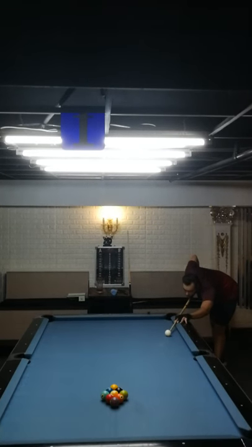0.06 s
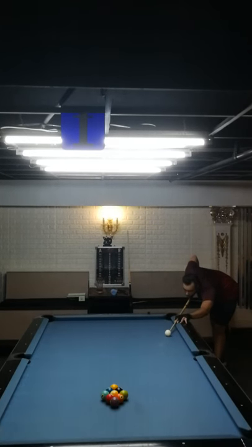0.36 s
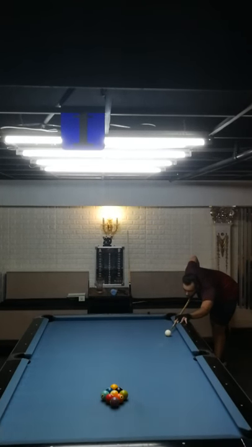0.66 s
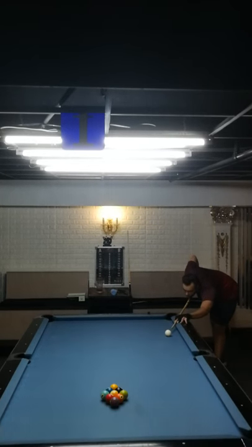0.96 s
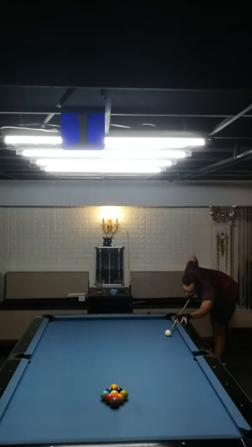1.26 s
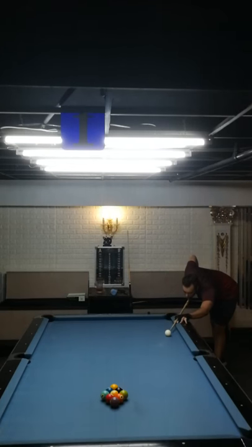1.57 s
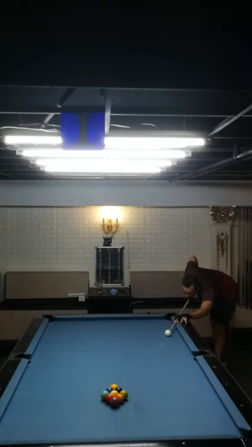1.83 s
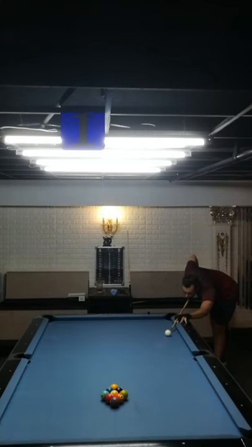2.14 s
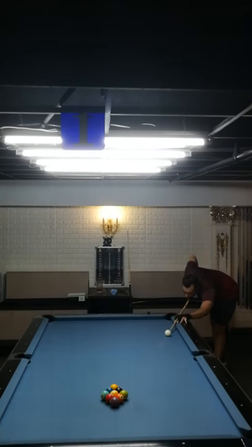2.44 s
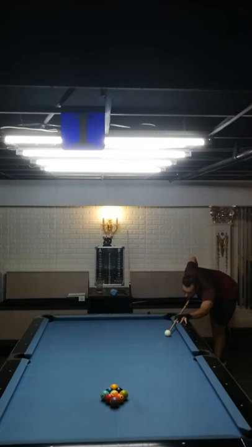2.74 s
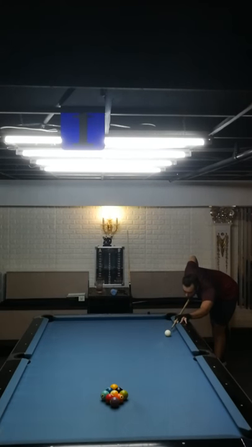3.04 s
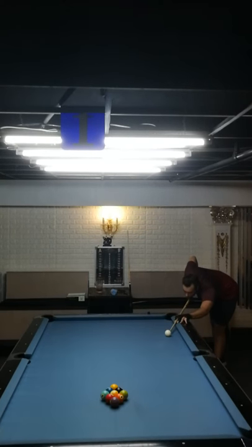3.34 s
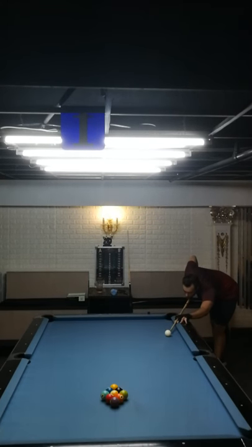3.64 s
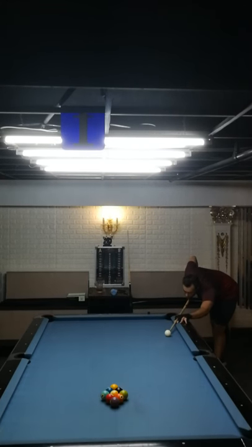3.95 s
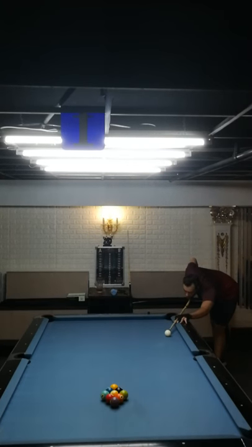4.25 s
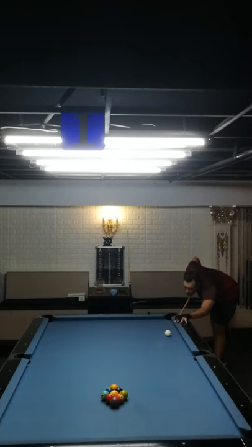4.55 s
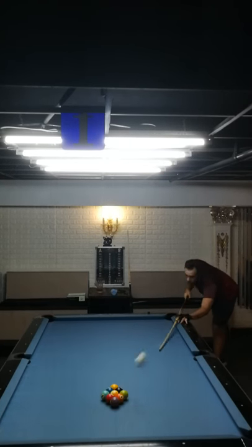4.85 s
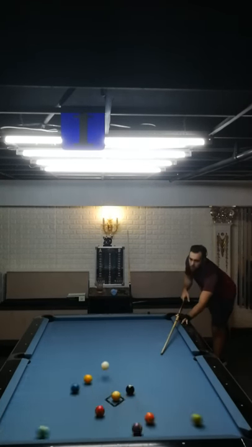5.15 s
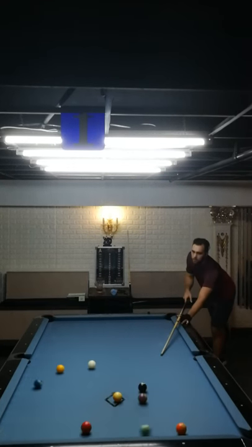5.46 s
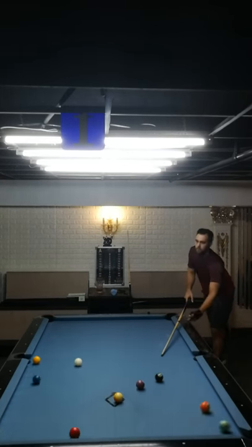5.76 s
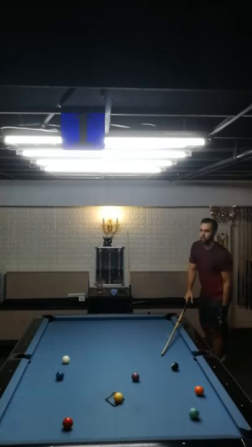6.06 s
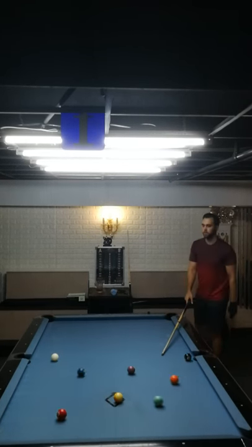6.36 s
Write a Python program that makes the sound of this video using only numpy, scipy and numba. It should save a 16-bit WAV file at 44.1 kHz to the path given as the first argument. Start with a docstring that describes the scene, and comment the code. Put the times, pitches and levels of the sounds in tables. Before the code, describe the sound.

Ventilation fans hum and slowly throb in a bare room for almost five seconds. Then a cue cracks against the cue ball, which knocks on the table and smashes loudly into the racked pool balls. They scatter, rumbling over the cloth, thudding against the cushions and clicking faintly as they slow. Each hit has a short echo, and the sound is brighter in the left microphone.

```python
"""A sharp crack and a loud smash, then rolling, thuds and clicks: a break shot on a pool table.
The cue strikes the cue ball, which scatters the racked balls; they rumble over the cloth and bump
the cushions. Each hit is a short pulse that echoes round a bare room, where two fans hum and throb.
A limiter turns the smash down and lets the sound swell back; the right microphone is shaded and dull."""
import sys
import numpy as np
from scipy import signal
from scipy.fft import rfft, irfft
from scipy.io import wavfile
from numba import njit

SR = 44100
rng = np.random.default_rng(int(sys.argv[2]) if len(sys.argv) > 2 else 0)


def waveform_to_disk(signal):
    """Save audio, clipped to [-1, 1], as 16-bit WAV at the path in sys.argv[1]."""
    frames = np.transpose(np.atleast_2d(signal))
    scaled = np.clip(frames, -1, 1) * 32767
    samples = np.round(scaled).astype(np.int16)
    wavfile.write(sys.argv[1], SR, samples)


N = 282240
BLOW = 2 ** 15   # samples in which a hit dies away
BREAK_S = 4.9449   # the cue ball reaches the rack
RIGHT_LAG_S = 26 / SR
FAN_A_HZ, FAN_B_HZ, MAINS_HZ = 73.81, 69.44, 120


def from_db(db):
    """Turn decibels into a number to multiply a sound by."""
    return 10 ** (np.asarray(db) / 20)


def at_hz(points, hz):
    """Read between the rows of a table, with all octaves equally wide."""
    known, values = np.transpose(points)
    return np.interp(np.log(np.maximum(hz, 1)), np.log(known), values)


def bins(size):
    """List the frequencies in a spectrum of this many samples."""
    return np.arange(size // 2 + 1) * SR / size


def coloured(x, colour):
    """Make each frequency louder or softer, as a table says."""
    size = x.shape[-1]
    return irfft(rfft(x) * from_db(at_hz(colour, bins(size))), size)


def diffuse(size):
    """White room noise at two microphones: the right hears it later, and less alike in the treble."""
    # how alike the two sides are: (frequency [Hz], likeness [0-1])
    likeness = [(80, .998), (200, 0.84), (400, 0.81), (800, 0.68), (3000, 0.28), (8000, 0.28), (15000, .6)]
    hz = bins(size)
    left, other = rfft(rng.standard_normal((2, size)))
    alike = np.clip(at_hz(likeness, hz), 0, 1)
    right = alike * left + np.sqrt(1 - alike ** 2) * other
    lag = np.exp(-2j * np.pi * hz * RIGHT_LAG_S)
    return irfft(np.array([left, right * lag]), size)


def steady(spectrum):
    """Even room noise with the given level per Hz."""
    return coloured(diffuse(N), spectrum) * np.sqrt(SR / 2)


def body(colour, modes=()):
    """A struck thing gives a short crack and rings on at its own notes (modes), if it has any."""
    t = np.arange(BLOW) / SR
    # minimum phase: keep the colour, but pack the sound at the very start
    cepstrum = irfft(np.log(from_db(at_hz(colour, bins(BLOW)))))
    cepstrum[1:BLOW // 2] *= 2
    cepstrum[BLOW // 2 + 1:] = 0
    crack = irfft(np.exp(rfft(cepstrum)))
    return crack + sum(from_db(db) * np.exp(-np.log(1000) * t / fade_s) * np.cos(2 * np.pi * hz * t)
                       for hz, db, fade_s in modes)


def room(direct_db, build_s, direct_s=0.00048, band_count=9):
    """Sound arrives directly (direct_db against the tail), then as two echoes and a fading tail."""
    # echoes off the lamp and ceiling: (delay [s], level against the direct sound [dB])
    echoes = [(.0077, -21), (.0136, -10)]
    # how long the room rings: (frequency [Hz], time to fade 60 dB [s])
    fade_times = [(100, 0.18), (350, .6), (1000, 0.55), (2500, 0.49), (5000, 0.28), (12000, 0.32)]
    t = np.arange(BLOW) / SR
    centres = np.geomspace(60, 15000, band_count)
    noise, tail = rfft(diffuse(BLOW)), 0
    for hz, share in zip(centres, np.eye(band_count)):
        band = irfft(noise * at_hz(np.c_[centres, share], bins(BLOW)))
        tail = tail + band * np.exp(-np.log(1000) * t / at_hz(fade_times, hz))
    path = tail * (1 - np.exp(-t / build_s))
    path /= np.sqrt(SR * fade_times[2][1] / np.log(1e6))   # divide out a mid-range tail's strength
    for delay, db in [(direct_s, 0)] + echoes:
        path[:, round(delay * SR)] += from_db(direct_db + db)
    return path


def add(out, s, sound):
    """Mix a sound in, starting at s seconds."""
    start = round(s * SR)
    out[:, start:start + sound.shape[-1]] += sound[..., :N - start]


def blows(hits, struck, direct_db, steepness, build_s=0.0014):
    """Each hit takes its own path through the room; a longer contact cuts off more treble."""
    out = np.zeros((2, N))
    for s, db, cutoff_hz in hits:
        contact = signal.butter(steepness, min(cutoff_hz, SR / 2 - 1000), fs=SR, output="sos")
        pulse = signal.sosfilt(contact, struck + 1e-18)
        pulse = from_db(db) * pulse / np.sqrt(np.sum(pulse ** 2))
        add(out, s, signal.fftconvolve(room(direct_db, build_s), pulse[None], axes=1))
    return out


def fans(waver=0.23, waver_hz=3, in_step_s=1.965):
    """Two motors at nearly the same speed drift in and out of step, throbbing over rushing air."""
    # hum of each fan and the mains: (pitch [Hz], list of (multiple of the pitch, level [dB]))
    hums = [(FAN_A_HZ, [(1, -43.8), (2, -53), (3, -56), (4, -57), (5, -68)]), (FAN_B_HZ, [(1, -48.3),
            (3, -58), (4, -66)]), (MAINS_HZ, [(1, -58.5), (2, -64)])]
    # rush of the ventilation: (frequency [Hz], level [dB per Hz])
    air = [(20, -80.5), (45, -81), (75, -66), (110, -70.5), (230, -71.5), (310, -72), (480, -81.5),
           (900, -77), (1500, -82.5), (2200, -87), (3300, -91.5), (5000, -105), (7500, -116), (15000, -128)]
    t = np.arange(N) / SR - in_step_s - np.array([[0], [RIGHT_LAG_S]])
    hum = 0
    for hz, tones in hums:
        for multiple, db in tones:
            slow = irfft(rfft(rng.standard_normal(N)) * np.exp(-(bins(N) / waver_hz) ** 2), N)
            swell = 1 + waver * (multiple - 1) * slow / slow.std()   # only the overtones waver
            hum = hum + np.sqrt(2) * from_db(db) * swell * np.cos(2 * np.pi * hz * round(multiple) * t)
    return hum + steady(air)


def whistles(width_hz=9):
    """Faint tones, each a narrow band of noise, come and go in the rush of air."""
    # the tones: (time of the top [s], pitch [Hz], level [dB], half length [s])
    tones = [(.55, 1045, -59.5, .22), (1.21, 835, -55, .11), (1.68, 838, -56.5, .13), (3.53, 664, -60, .08)]
    t, noise, out = np.arange(N) / SR, rfft(diffuse(N)), 0
    for s, hz, db, half_s in tones:
        narrow = irfft(noise / (1 + ((bins(N) - hz) / width_hz) ** 2), N)
        out = out + from_db(db) * np.exp(-.5 * ((t - s) / half_s) ** 2) * narrow / narrow.std()
    return out


def rolling(roll_db=-3.5, rise_s=.15, fade_db_per_s=2.5, swell_s=5.85, swell_db=2.5, swell_half_s=.075):
    """The scattered balls rumble, swell once and fade as the cloth slows them."""
    # balls rolling on the slate under the cloth: (frequency [Hz], level before shaping [dB per Hz])
    rumble = [(40, -73), (110, -69), (200, -59.5), (320, -65.5), (500, -76), (900, -72.5), (1600, -86),
              (4000, -111), (12000, -150)]
    t = np.arange(N) / SR
    age = np.maximum(t - BREAK_S, 0)
    roll = from_db(roll_db - fade_db_per_s * age) * (1 - np.exp(-age / rise_s))
    swell = from_db(swell_db) * np.exp(-.5 * ((t - swell_s) / swell_half_s) ** 2)
    return np.hypot(roll, swell) * steady(rumble)


def ball_ticks(cutoff_hz=6700):
    """Faint, sharp ticks sound among the balls."""
    # the ticks: (time [s], level [dB])
    ticks = [(5.362, -17), (5.507, -15.5), (6.048, -20)]
    # tone of a tick: (frequency [Hz], relative level [dB])
    colour = [(300, -14), (2000, 5), (5000, -6), (14000, -37)]
    hits = [(s, db, cutoff_hz) for s, db in ticks]
    return blows(hits, body(colour), direct_db=-13, steepness=1, build_s=0.0018)


def cushion_thuds(nudge_count=3, from_s=5.62, to_s=5.92, nudge_db=-8, spread_db=2):
    """Balls bump the table's rails; a faster ball leaves the rubber sooner and sounds brighter."""
    # ball on cushion: (time [s], level [dB])
    bumps = [(5.03, 5), (5.097, 6), (5.147, 6.5), (5.2312, 19), (5.244, 15), (5.4045, 10), (5.437, 7),
             (5.495, 4.5), (5.785, -2), (5.941, -6), (6.274, -2), (6.318, -3.5), (6.368, -1)]
    # tone of a rail: (frequency [Hz], relative level [dB])
    colour = [(50, -26), (120, 0), (230, 5), (340, 0), (480, 5.5), (750, 10), (1100, 10.5), (1800, 6.5),
              (2700, 9), (4000, 4.5), (6000, -24), (12000, -34)]
    # ringing of the rails: (pitch [Hz], relative level [dB], time to fade 60 dB [s])
    modes = [(335, -44, .25), (378, -47, .15), (667, -50, .25), (746, -50, .25), (1102, -48, .2),
             (1220, -49, .25), (1384, -50, .2), (1506, -49, .2)]
    # slow balls add a few soft nudges at random
    slots = (np.arange(nudge_count) + rng.random(nudge_count)) / nudge_count
    nudges = zip(from_s + (to_s - from_s) * slots, nudge_db + spread_db * rng.standard_normal(nudge_count))
    cutoff_hz, db_per_octave = 750, 16.5   # treble cut-off at 0 dB, and the extra level that doubles it
    hits = [(s, db, cutoff_hz * 2 ** (db / db_per_octave)) for s, db in [*bumps, *nudges]]
    return blows(hits, body(colour, modes), direct_db=-14.5, steepness=3)


def slate_knocks():
    """The hopping cue ball lands on the slate; then the break jolts the slate with a dull thud."""
    # knocks on the slate: (time [s], level [dB], treble cut-off [Hz])
    hits = [(4.862, 3, 9000), (4.876, 11, 7000), (4.949, 14, 900)]
    # tone of a knock: (frequency [Hz], relative level [dB])
    colour = [(100, -17), (350, -7), (700, -4.5), (1300, -1), (2200, -1.5), (3300, -5.5), (4500, -7),
              (7000, -19), (10000, -27), (14000, -55)]
    return blows(hits, body(colour), direct_db=-24, steepness=2)


def cue_strike():
    """The cue cracks against the ball, knocks the table with its shaft and rings briefly."""
    # cue on ball and table: (time [s], level [dB], treble cut-off [Hz])
    hits = [(4.7862, 16.5, 1210), (4.7884, 8.5, 14000), (4.801, 14, 8000)]
    # tone of the cue: (frequency [Hz], relative level [dB])
    colour = [(60, -33), (180, -7), (340, -1.5), (500, -7.5), (750, 1.5), (1200, 0.5), (1800, -4),
              (2700, 2), (3600, -2.5), (5500, -13), (8000, -18.5), (14000, -37)]
    # ringing of the cue: (pitch [Hz], relative level [dB], time to fade 60 dB [s])
    modes = [(895, -50, .2), (982, -52, .2), (1400, -45, .1), (1506, -41, .22), (2189, -46, .3),
             (2420, -51, .25), (2560, -48, .15), (2805, -47, .25), (4385, -34, .085), (4470, -40, .06),
             (5930, -44, .045)]
    return blows(hits, body(colour, modes), direct_db=-17, steepness=2)


def overload_thump(db=2, length_s=0.00096, after_s=0.0012):
    """A brief low thump as the loud crack overloads the microphones."""
    out = np.zeros((2, N))
    age = np.arange(BLOW) / SR / length_s
    add(out, BREAK_S + after_s, -from_db(db) * age * np.exp(1 - age))
    return out


def ball_smash():
    """The blow runs from ball to ball through the rack; one more clack comes later."""
    # ball on ball: (time [s], level [dB], treble cut-off [Hz])
    hits = [(4.9449, 26, 2950), (4.9452, 8, 4900), (4.9453, 23, 3150), (5.5875, 3, 2850)]
    # tone of a clack: (frequency [Hz], relative level [dB])
    colour = [(60, -58), (300, -25), (600, -13.5), (1100, -1), (1800, 2.5), (2700, 4.5), (4000, 11),
              (12000, -1)]
    return blows(hits, body(colour), direct_db=-6.5, steepness=12, build_s=0.0033)


def scene():
    """Mix the shot, the scattering balls and the room's hum."""
    shot = cue_strike() + slate_knocks() + ball_smash() + overload_thump()
    return shot + cushion_thuds() + ball_ticks() + rolling() + fans() + whistles()


@njit
def follow(over, attack, release):
    """Follow a level up quickly and let go slowly (times in samples)."""
    out, held = np.zeros(len(over)), 0.
    for i in range(len(over)):
        held += (over[i] - held) / (attack if over[i] > held else release)
        out[i] = held
    return out


def record(dry, limit_db=-9.7, attack_s=0.00032, release_s=.14, cutoff_hz=15800):
    """Two hissing microphones feed a limiter too slow for the first peak, which gets squashed."""
    # microphone hiss: (frequency [Hz], level [dB per Hz])
    hiss_colour = [(100, -112), (3000, -113), (7000, -116), (11000, -118), (15000, -120)]
    # dullness of the shaded right microphone: (frequency [Hz], level against the left [dB])
    right_shade = [(60, 0), (220, 0), (380, -1), (700, -7), (1300, -10), (2400, -14), (4400, -18),
                   (8000, -14), (15000, -11)]
    hiss = coloured(rng.standard_normal((2, N)), hiss_colour) * np.sqrt(SR / 2)
    heard = np.array([dry[0], coloured(dry[1], right_shade)]) + hiss
    level_db = 20 * np.log10(np.abs(heard).max(axis=0) + 1e-9)
    over_db = np.maximum(level_db - limit_db, 0)
    limited = heard * from_db(-follow(over_db, attack_s * SR, release_s * SR))
    clipped = limited / (1 + limited ** 4) ** .25
    treble_cut = signal.ellip(10, .1, 80, cutoff_hz, fs=SR, output="sos")
    return signal.sosfilt(treble_cut, clipped)


dry = scene()
out = record(dry)
waveform_to_disk(out)
```